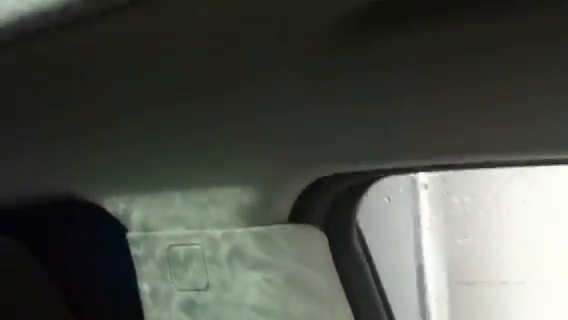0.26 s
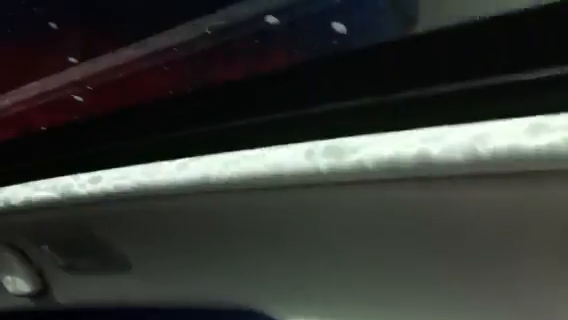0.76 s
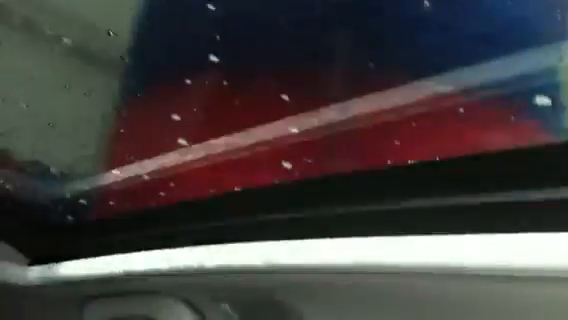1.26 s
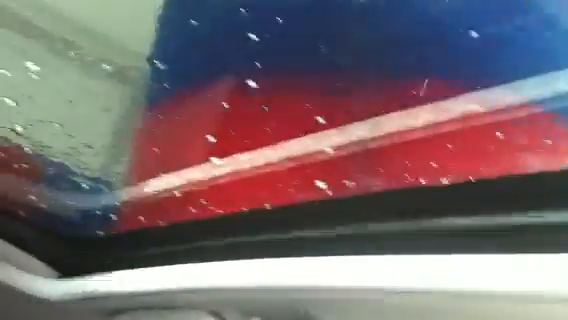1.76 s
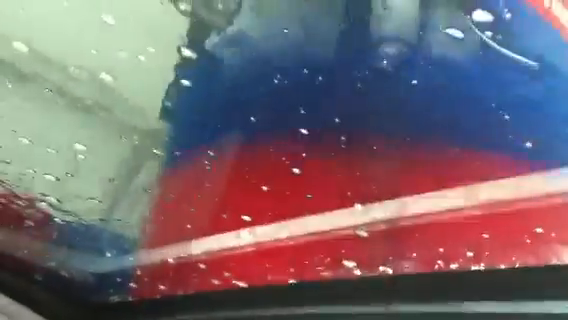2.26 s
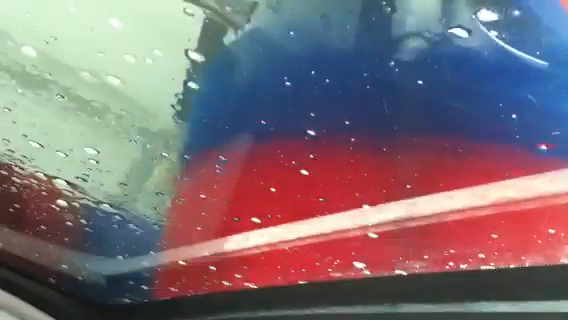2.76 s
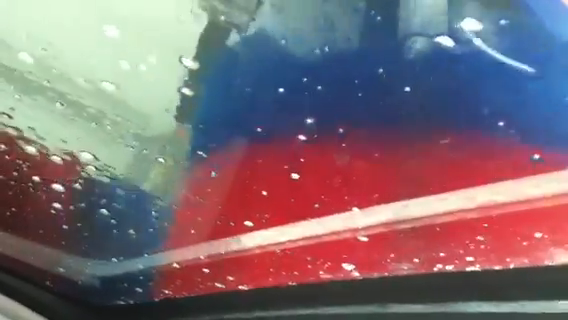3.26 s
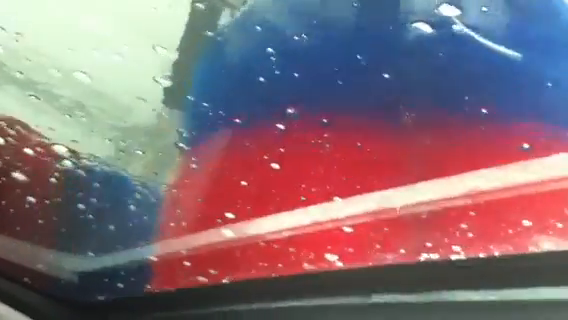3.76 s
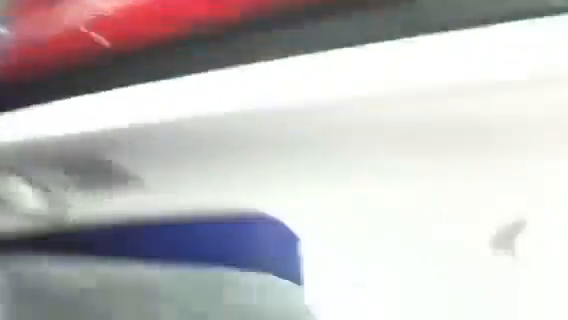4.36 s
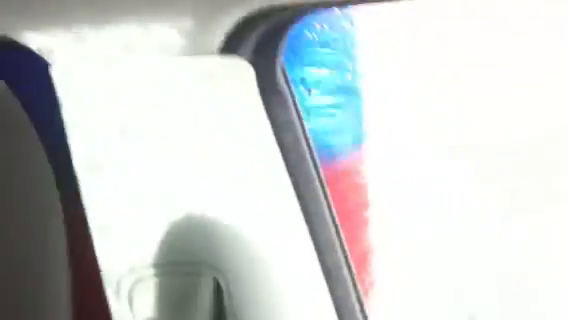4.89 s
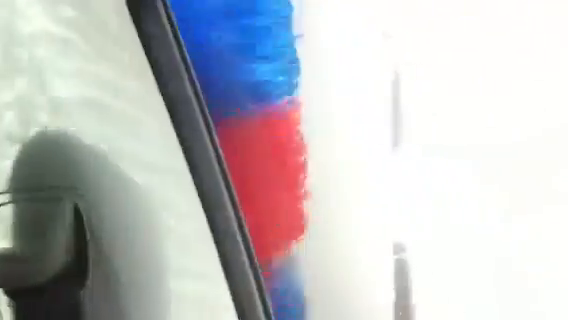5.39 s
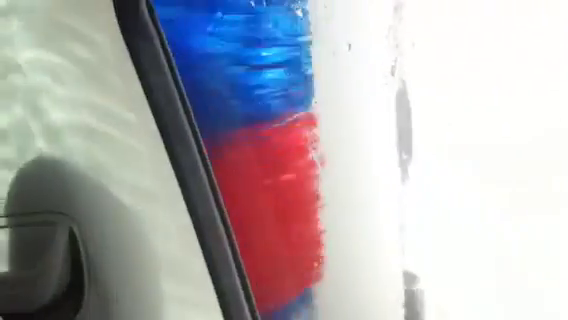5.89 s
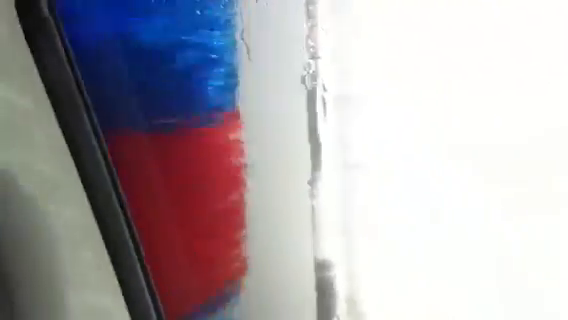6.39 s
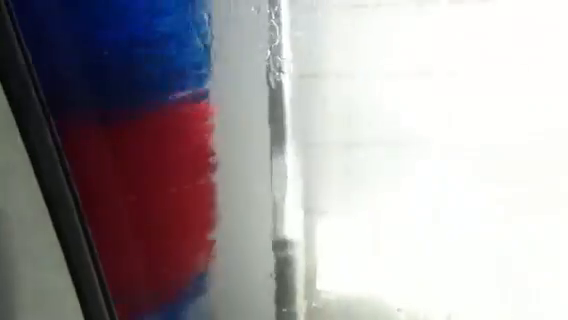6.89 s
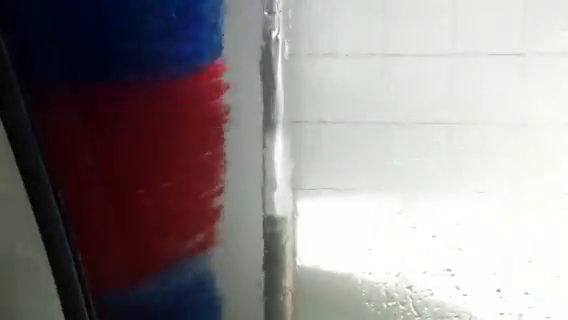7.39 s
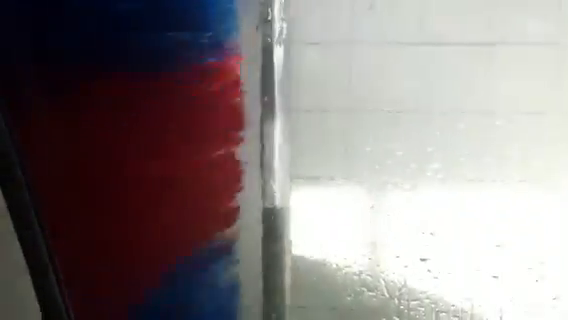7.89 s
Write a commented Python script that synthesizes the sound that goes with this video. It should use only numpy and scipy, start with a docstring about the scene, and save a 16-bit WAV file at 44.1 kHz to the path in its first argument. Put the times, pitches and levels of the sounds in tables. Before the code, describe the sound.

Inside a car during an automatic wash, steady water hisses and spatters over ringing window glass, with low machinery rumble and faint brushing on the body. At about 0.7 s a finger covers the microphone; dull bumps and raspy rubs cluster from 0.85 to 1.05 s, with the heaviest around 1.4 s. The wash becomes a quiet, bassy murmur, broken by a small pop at 2.1 s and a faint one at 3.2 s. Around 4.1 s a very loud thump and rubbing begin the release, and sharp pops near 4.4 s suddenly restore the bright spray, somewhat held down and slowly swelling. From 5.4 s cloth strips drum hollowly on the panels. Water thins around 6 to 7 s, then surges near 7.2 and 7.7 s; resonant slaps land about 5.75, 6.65, 7.8 and 8 s. The wash continues to the end.

```python
"""Inside a car in an automatic wash: slaps of a spinning cloth brush drum on resonant body panels.
Water, as random drops and filtered noise, spatters on ringing glass; machinery rumbles below.
A finger rubs and bumps on the microphone port as bursts of filtered noise, muffles the wash
for over three seconds and lifts off with pops, which are damped swings of the trapped air.
The hardest rubs and pops drive the recorder's limiter; its gain swells back slowly."""
import sys
import numpy as np
from scipy import signal
from scipy.fft import rfft, irfft, next_fast_len
from scipy.io import wavfile
from scipy.ndimage import uniform_filter1d

SR = 44100
rng = np.random.default_rng(int(sys.argv[2]) if len(sys.argv) > 2 else 0)


def dump(signal):
    """Clip the signal to [-1, 1] and save it as 16-bit WAV at the path in sys.argv[1]."""
    limited = np.clip(np.atleast_2d(signal).T, -1, 1)
    pcm = np.round(limited * 32767).astype(np.int16)
    wavfile.write(sys.argv[1], SR, pcm)


N = 358974
TIME = np.arange(N) / SR


def from_db(db):
    """Decibels to gain."""
    return 10 ** (np.asarray(db) / 20)


def rms_one(x):
    """Scale to rms 1."""
    return x / np.sqrt(np.mean(x ** 2) + 1e-20)


def in_time(rows):
    """Interpolate a (time, value) table at every sample."""
    time_s, value = np.transpose(rows)
    return np.interp(TIME, time_s, value)


def noise():
    """White noise, rms 1."""
    return rng.standard_normal(N)


def colour(x, spectrum):
    """Filter by a (Hz, dB) curve, interpolated over log frequency."""
    size = next_fast_len(N + 8192)
    hz, db = np.transpose(spectrum)
    bins_hz = np.maximum(np.fft.rfftfreq(size, 1 / SR), 1)
    gain = from_db(np.interp(np.log(bins_hz), np.log(hz), db))
    return irfft(rfft(x, size) * gain, size)[:N]


def butter(x, hz, kind, order):
    """Causal low- or high-pass."""
    sos = signal.butter(order, min(hz, .45 * SR), kind, fs=SR, output="sos")
    return signal.sosfilt(sos, x)


def drift(corner_hz):
    """Slow random curve of rms 1: two-pole low-passed noise."""
    step = 40   # samples per control point
    pole = np.exp(-2 * np.pi * corner_hz * step / SR)
    control = rng.standard_normal(N // step + 2002)
    slow = signal.lfilter([1], [1, -2 * pole, pole * pole], control)[2000:]   # settled part
    return np.interp(np.arange(N) / step, np.arange(len(slow)), rms_one(slow))


def resonate(x, modes):
    """Parallel two-pole resonances of (Hz, width Hz, dB), signs alternating."""
    out = 0
    for k, (hz, width_hz, level_db) in enumerate(modes):
        radius = np.exp(-np.pi * width_hz / SR)
        poles = [1, -2 * radius * np.cos(2 * np.pi * hz / SR), radius * radius]
        gain = (-1) ** k * from_db(level_db) * (1 - radius * radius) / 2
        out = out + gain * signal.lfilter([1, 0, -1], poles, x)
    return out


def impacts(per_s, spread_db):
    """Random small blows, mostly weak and a few strong; rms 1."""
    sizes = from_db(spread_db * np.minimum(rng.exponential(1, N), 4))
    signed = sizes * rng.choice([-1, 1], N)
    return rms_one(signed * (rng.random(N) < per_s / SR)) + 1e-18


def steady(x, window_s):
    """Divide by the running rms: average strength 1, faster flutter kept."""
    power = uniform_filter1d(x ** 2, max(int(window_s * SR), 2))
    return x / np.sqrt(np.abs(power) + 1e-12)


# body panel resonances: pitch_hz, width_hz, level_db
PANEL_MODES = [(200, 16, -9.5), (238.4, 18.7, -1.5), (274.4, 13.8, 2.5), (294.9, 20.5, -1.5), (353, 19, -6),
               (467, 16, -23), (574, 53, -23.5)]
# how hard the cloth brush bears on the body: time_s, level_db
BRUSH_PRESSURE = [(0, -39), (0.3, -34.5), (0.72, -35.5), (4.43, -33), (5.35, -31.5), (5.44, -25),
                  (5.53, -28.5), (5.77, -24.5), (6.07, -34), (6.48, -40.5), (6.68, -25), (6.95, -30),
                  (7.17, -21), (7.39, -26.5), (7.48, -23), (7.74, -20), (7.93, -27), (8.12, -34.0)]
DRUMMING_DB = -0.5   # re brush pressure
FLAP_CORNER_HZ, FLAP_DB = 22, 2   # strips arrive in bunches


def brush_drumming(brush_db, flap):
    """Random cloth slaps, bunched by the flap curve, excite the panel resonances."""
    slaps = impacts(per_s=900, spread_db=2.0) * from_db(FLAP_DB * flap)
    drumming = steady(resonate(slaps, PANEL_MODES), window_s=0.11)
    return from_db(brush_db + DRUMMING_DB) * drumming


# single hard slaps of a wet strip: start_s, peak_db
HARD_SLAPS = [(5.753, -16.5), (6.649, -18.5), (7.205, -39), (7.601, -26), (7.786, -19), (8.005, -21)]


def hard_slaps():
    """A heavy strip lands flat and sets all the panel resonances ringing."""
    blow = resonate(signal.unit_impulse(N), PANEL_MODES)[:SR // 4]
    blow = blow / np.abs(blow).max()
    out = np.zeros(N)
    for start_s, peak_db in HARD_SLAPS:
        start = int(start_s * SR)
        out[start:start + len(blow)] += from_db(peak_db) * blow[:N - start]
    return out


# spectrum of running water: freq_hz, density_db
SHEET_SPECTRUM = [(200, -44), (330, 9), (420, 4.5), (520, -1.5), (750, 1.5), (1100, -2), (1500, -10),
                  (2200, -11.5), (4000, -13.5), (8000, -48)]
# window glass resonances: pitch_hz, width_hz, level_db
GLASS_MODES = [(538, 110, -2.5), (641, 94, 0.5), (760, 110, -7.5), (906.6, 15, 2.5), (1040, 26, 0),
               (1240, 230, -13), (1920, 170, -14.5)]
SHEET_DB = 2.5   # re the mix of flow and brush curves
SHEET_FROM_BRUSH = 0.12   # share of the brush curve: it flings water
PANES_DB = -5.5   # re running water


def water_sheet(flow_db, brush_db):
    """Dense drops make the running water; sparser ones ring the glass."""
    sheet_db = SHEET_DB + flow_db + SHEET_FROM_BRUSH * (brush_db - flow_db)
    running = rms_one(colour(impacts(per_s=5000, spread_db=3.0), SHEET_SPECTRUM))
    panes = rms_one(resonate(impacts(per_s=3000, spread_db=2.5), GLASS_MODES))
    return from_db(sheet_db) * (running + from_db(PANES_DB) * panes)


# spectrum of the drops: freq_hz, density_db
DROP_SPECTRUM = [(600, -12.5), (1400, 2.5), (2300, 0.5), (3000, 0), (3900, 1), (5200, -1), (7000, -6.5),
                 (8800, -8.5), (10500, -11), (15800, -19.5)]
# fine mist, relative to the drops: time_s, level_db
MIST_LEVEL = [(.7, -16), (4.43, -4), (5.6, -9.5), (6.4, -6.5), (8.1, -7.5)]
# spectrum of the mist: freq_hz, density_db
MIST_SPECTRUM = [(2000, -19), (5000, -4.5), (7000, 0.5), (8900, 2.5), (10500, -6.5), (13000, -6),
                 (15800, -12)]
DROPS_DB = -0.13   # re flow


def spray(flow_db):
    """Drops (noise plus impacts) and mist (noise) hiss, each flickering in level."""
    drops = rms_one(colour(noise() + impacts(per_s=7000, spread_db=1.5), DROP_SPECTRUM))
    mist = rms_one(colour(noise(), MIST_SPECTRUM))
    drops = drops * from_db(.55 * drift(35))
    mist = mist * from_db(in_time(MIST_LEVEL) + 0.79 * drift(45))
    return from_db(flow_db + DROPS_DB) * (drops + mist)


# how much water strikes the glass: time_s, level_db
WATER_FLOW = [(0, -41.5), (0.45, -40.5), (0.52, -38), (0.58, -42), (0.7, -37.5), (4.43, -39.5),
              (4.82, -36.5), (4.97, -38.5), (5.65, -36.5), (5.82, -38), (5.98, -44.5), (6.55, -44.0),
              (7.0, -43.5), (7.17, -36.5), (7.36, -42), (7.68, -34.5), (7.9, -40.0), (8.12, -42.5)]


def water(brush_db, flap):
    """Running water and spray follow the flow and sway with the brush strips."""
    flow_db = in_time(WATER_FLOW)
    return (water_sheet(flow_db, brush_db) + spray(flow_db)) * from_db(0.8 * flap)


# cabin rumble spectrum: freq_hz, density_db
RUMBLE_SPECTRUM = [(20, -44), (45, -41), (65, -25), (85, -12.5), (120, 1.5), (150, 2), (200, 1.5),
                   (300, -7.5), (450, -4), (900, -45.5)]
RUMBLE_DB = -33


def machinery_rumble():
    """Steady low-frequency noise of the machinery in the cabin."""
    return from_db(RUMBLE_DB) * steady(colour(noise(), RUMBLE_SPECTRUM), window_s=0.21)


def wash():
    """Brush and water share one pressure curve and one flap curve."""
    brush_db = in_time(BRUSH_PRESSURE)
    flap = drift(FLAP_CORNER_HZ)
    brush = brush_drumming(brush_db, flap) + hard_slaps()
    return brush + water(brush_db, flap) + machinery_rumble()


# share of the port that the finger closes: time_s, share_0_to_1
PORT_COVER = [(.715, 0.2), (.74, 0.94), (.78, 0.95), (.95, 1), (4.39, 1), (4.405, 0.04)]
# what passes the finger: freq_hz, gain_db
FINGER_PASS = [(30, -12), (80, -4), (140, -13), (220, -13.5), (320, -18), (500, -22.5), (1000, -29),
               (1700, -36), (3700, -36), (6000, -34.5), (15000, -36)]


def muffle(x):
    """The finger shuts out the treble; some bass passes through the flesh and the seal."""
    cover = np.clip(in_time(PORT_COVER), 0, 1)
    return (1 - cover) * x + cover * colour(x, FINGER_PASS)


# skin rasping on the rim of the port: freq_hz, density_db
RASP_SPECTRUM = [(25, -25), (90, -9), (150, 7), (280, -1), (400, -1.5), (580, -5), (850, -11), (1250, -18),
                 (1850, -25), (2700, -32), (4100, -39.5), (6500, -48.5), (11000, -59), (15800, -59.5)]
# skin sliding over the port: middle_s, length_s, level_db, rasp_db (re thud)
RUB_STROKES = [(0.782, 0.3, -30, -2), (0.847, 0.019, -20, -5.5), (0.873, 0.039, -13, -5),
               (0.903, 0.03, -19.5, -3.5), (0.974, .033, -14.5, -1.5), (1.004, 0.039, -14.5, 4),
               (1.03, 0.015, -24, -19), (1.115, 0.065, -32.5, -3), (1.195, 0.14, -36, -2),
               (1.25, 0.023, -30.5, -14), (1.281, 0.057, -21.5, -7.5), (1.35, 0.032, -49.5, -6),
               (1.403, 0.025, -5, -2.5), (1.424, 0.031, -11.5, 10.5), (1.45, 0.019, -5.5, -5),
               (1.562, 0.056, -39, -18), (1.792, 0.024, -28, -15), (4.081, 0.057, -36, -4.5),
               (4.099, .02, -7.5, -6), (4.122, 0.049, -10, 1), (4.151, .015, -18, -17),
               (4.172, 0.078, -24.5, -6.5), (4.28, 0.09, -31.5, -5.5), (4.364, 0.041, -24, -1.5)]


def rubs():
    """Tiny slips of skin pump the air trapped in the port; the rim adds a rasp."""
    trapped_air = resonate(noise(), [(183.0, 67, 0)])
    thud = steady(butter(trapped_air, 380, "low", order=2), window_s=0.01)
    catches = noise() + impacts(per_s=700, spread_db=0.5)   # skin sticks and lets go
    rasp = steady(colour(catches, RASP_SPECTRUM), window_s=0.018)
    out = np.zeros(N)
    for middle_s, length_s, level_db, rasp_db in RUB_STROKES:
        near = np.abs(TIME - middle_s) < length_s + .05
        stroke = np.exp(-np.abs(2 * (TIME[near] - middle_s) / length_s) ** 3)
        rub = thud[near] + from_db(rasp_db) * rasp[near]
        out[near] += from_db(level_db) * stroke * rub
    return butter(out, 120, "high", order=2)


# skin sticking to or parting from the port:
# start_s, level_db, pitch_hz (trapped air), t60_s, snap_db (re swing), snap_hz, treble_edge_hz
PORT_POPS = [(2.0934, -11.5, 135, 0.03, -3.5, 1000, 4480), (3.243, -34, 300, .037, -8, 810, 1400),
             (4.0897, 9.5, 193, 0.046, -16.5, 810, 5000), (4.361, -9, 200, 0.013, -21, 900, 7000),
             (4.376, -14.5, 208, .025, -6, 900, 3034), (4.3873, 4, 260, 0.018, -3.5, 730, 10150),
             (4.3913, -0.5, 260, 0.009, 4, 770, 2180)]
DUCT_HZ, DUCT_DECAY_S = 2180, 0.00013   # narrow duct behind the port
SNAP_DECAY_S = 0.00081


def pops():
    """A sharp pressure snap rings the duct; the trapped air swings a few times."""
    out = np.zeros(N)
    t = np.arange(SR // 8) / SR
    duct = np.sin(2 * np.pi * DUCT_HZ * t) * np.exp(-t / DUCT_DECAY_S)
    for start_s, level_db, pitch_hz, t60_s, snap_db, snap_hz, treble_edge_hz in PORT_POPS:
        start = int(start_s * SR)
        swing = np.sin(2 * np.pi * pitch_hz * t) * from_db(-60 * t / t60_s)
        snap = np.sin(2 * np.pi * snap_hz * t) * np.exp(-t / SNAP_DECAY_S)
        pressure = swing + from_db(snap_db) * (duct - snap)
        pressure = butter(pressure, treble_edge_hz, "low", order=2)
        leaked = butter(pressure, .6 * pitch_hz, "high", order=2)   # steady pressure leaks past skin
        out[start:start + len(t)] -= from_db(level_db) * leaked
    return out


MIC_HISS_DB = -73


def mic_hiss():
    """White self-noise of the microphone."""
    return from_db(MIC_HISS_DB) * noise()


def scene():
    """The wash through the finger, the finger's own noises and the microphone's hiss."""
    return (muffle(wash()) + rubs() + pops() + mic_hiss())[None]


LIMIT_DB, LIMIT_SMOOTH_S, LIMIT_RECOVERY_S = -2.5, 0.004, 0.97


def limiter(x):
    """A peak over the limit cuts the gain; the cut in dB then decays exponentially."""
    over_db = np.maximum(20 * np.log10(np.abs(x) + 1e-9) - LIMIT_DB, 0)
    fading = np.exp(-TIME / LIMIT_RECOVERY_S)
    cut_db = np.maximum.accumulate(over_db / fading, axis=-1) * fading   # largest decaying cut
    return x * from_db(-uniform_filter1d(cut_db, max(int(LIMIT_SMOOTH_S * SR), 1)))


CEILING, CUTOFF_HZ = .75, 15900   # ceiling re full scale


def record(dry):
    """Limit the level, round off what exceeds the ceiling and cut the top treble."""
    held = limiter(dry)
    rounded = held / (1 + (held / CEILING) ** 8) ** (1 / 8)
    low_pass = signal.ellip(12, .1, 80, CUTOFF_HZ, fs=SR, output="sos")
    return signal.sosfilt(low_pass, rounded)


dry = scene()
out = record(dry)
dump(out)
```